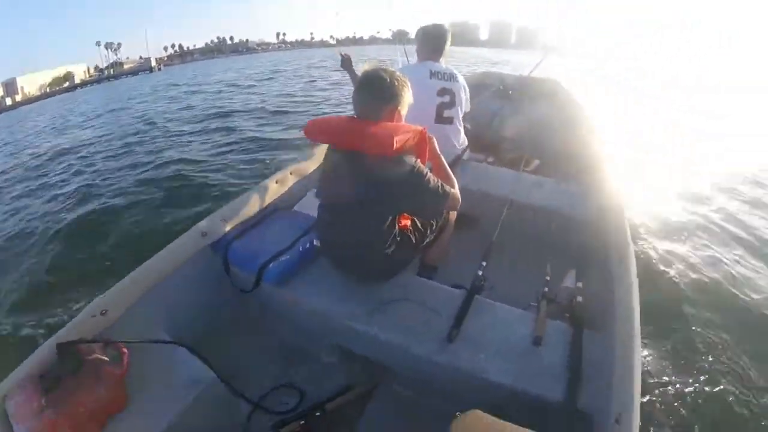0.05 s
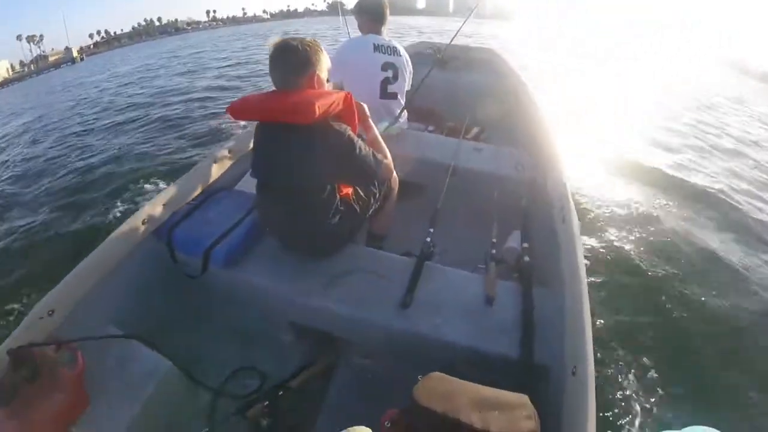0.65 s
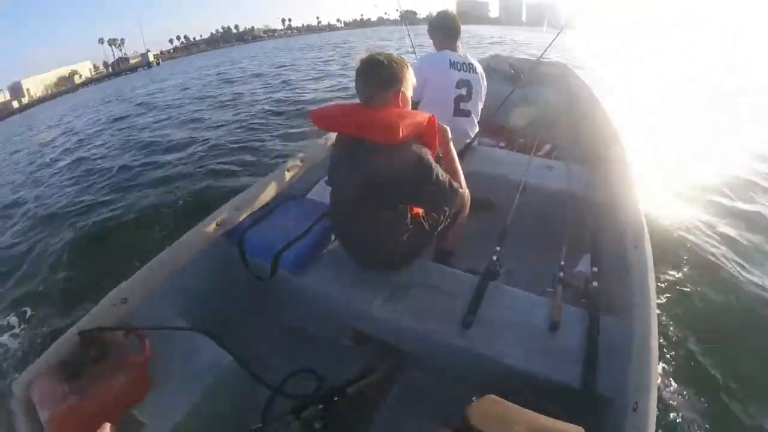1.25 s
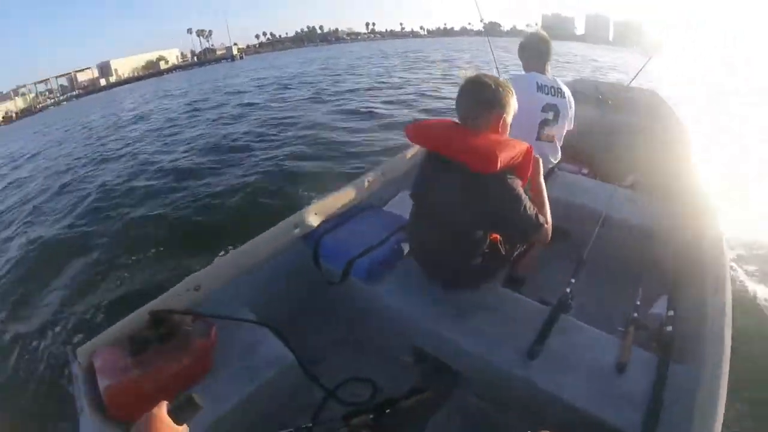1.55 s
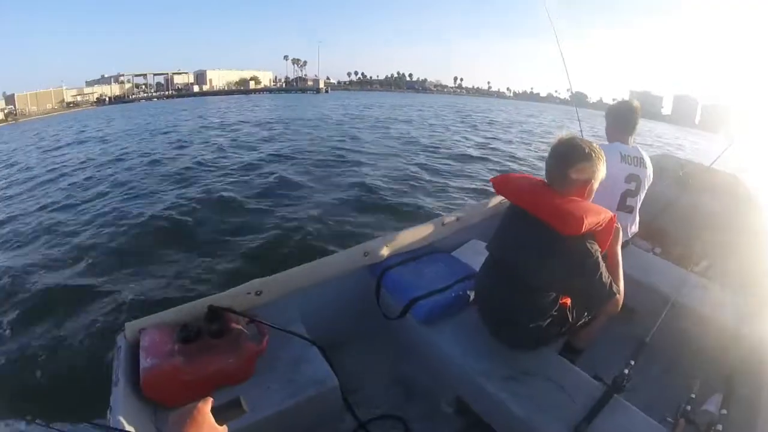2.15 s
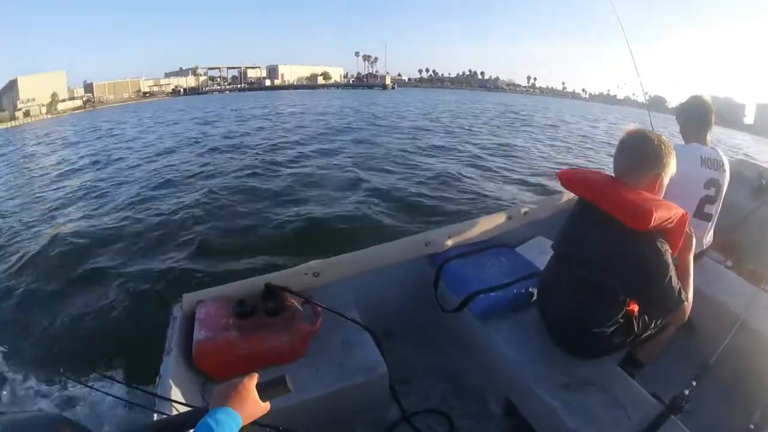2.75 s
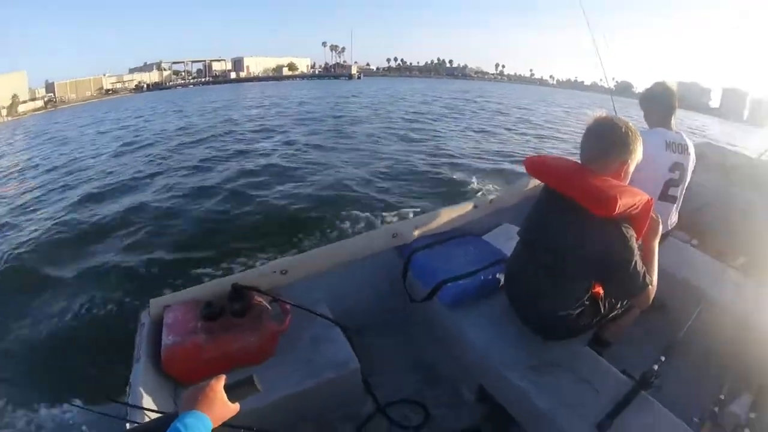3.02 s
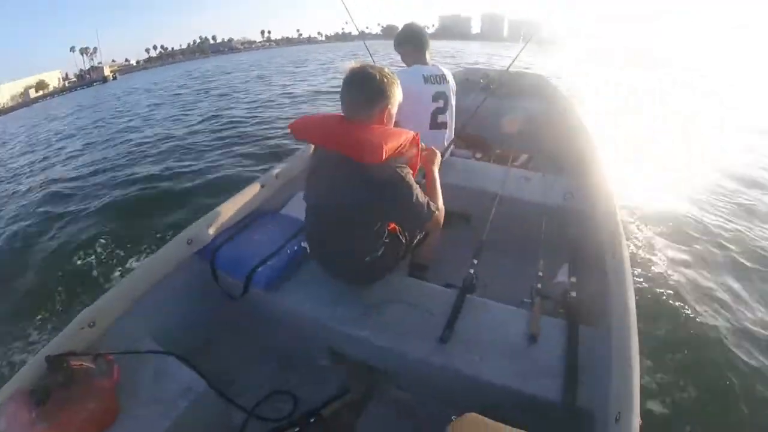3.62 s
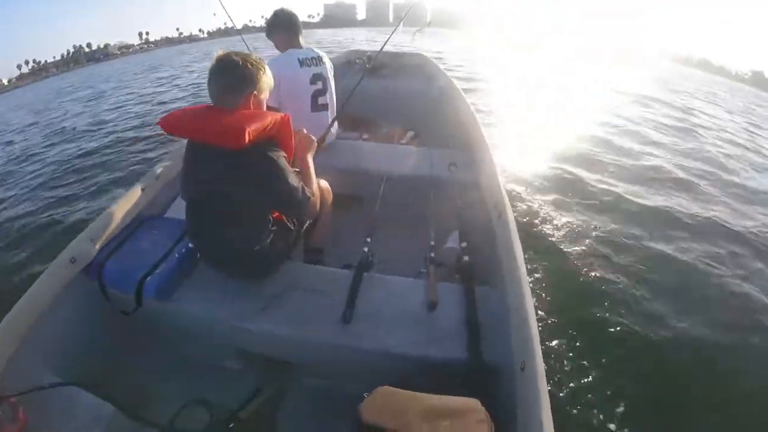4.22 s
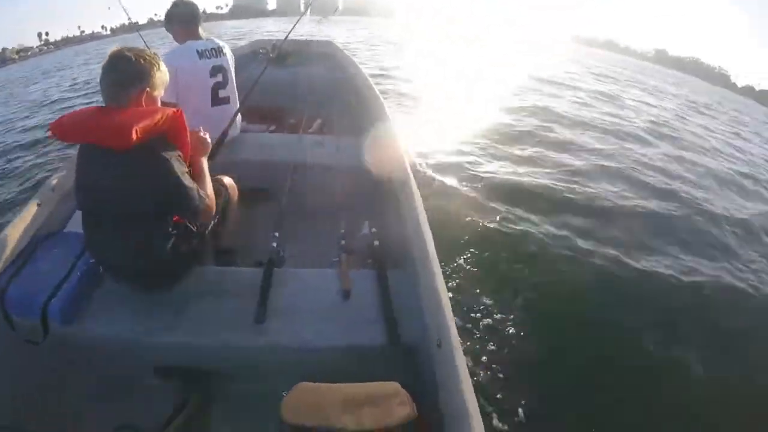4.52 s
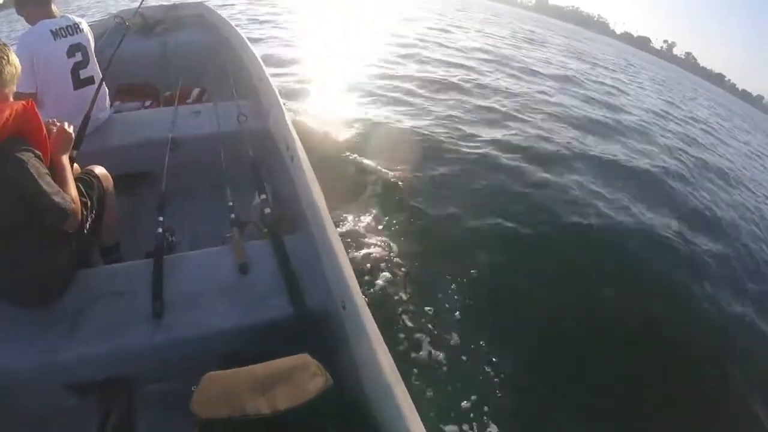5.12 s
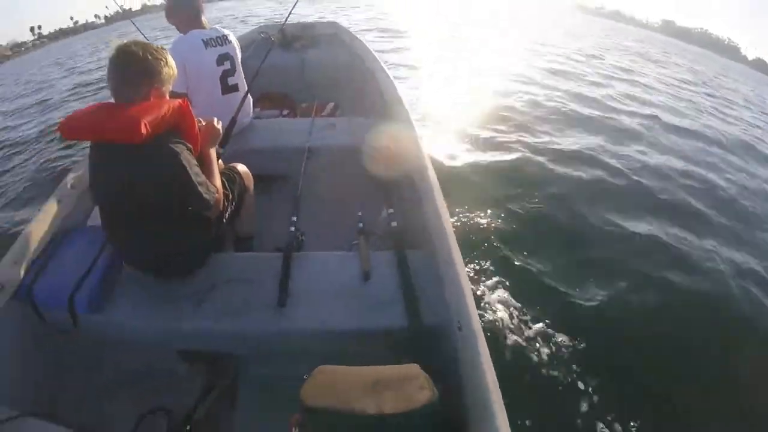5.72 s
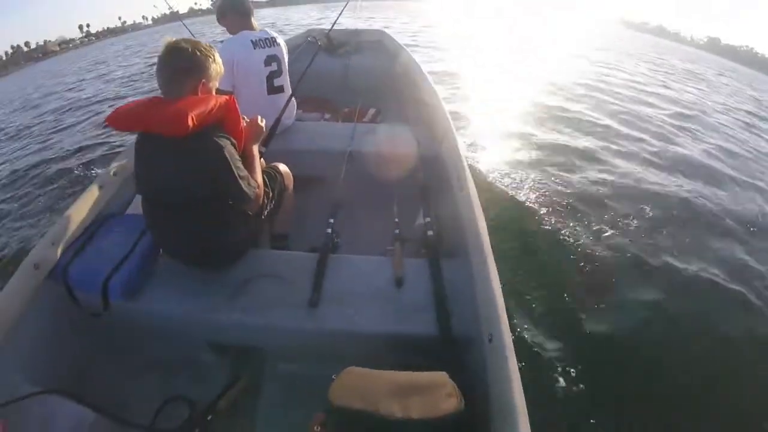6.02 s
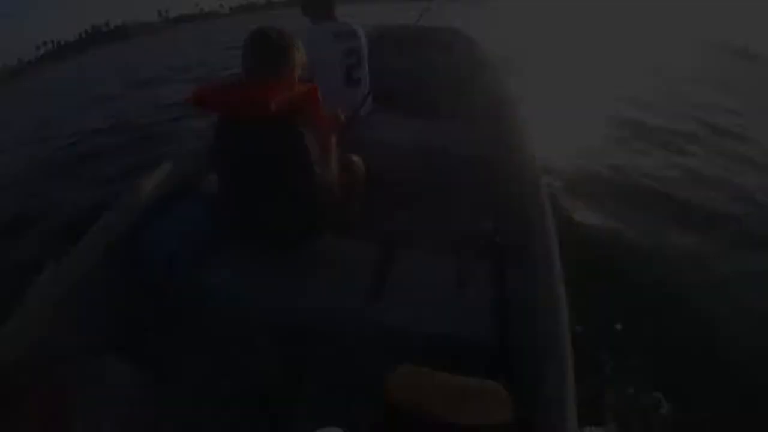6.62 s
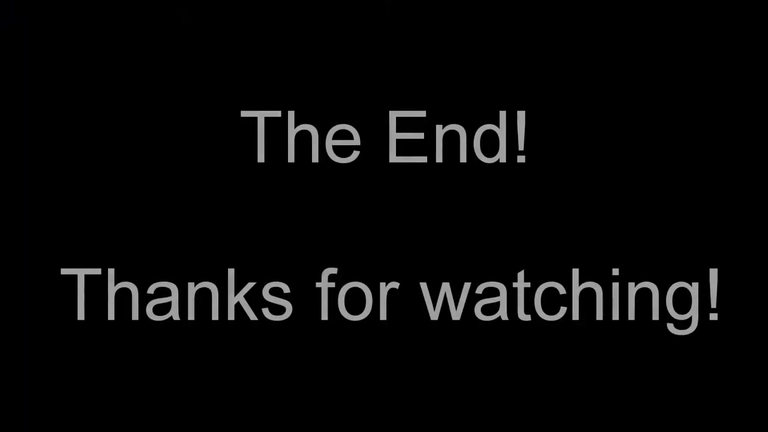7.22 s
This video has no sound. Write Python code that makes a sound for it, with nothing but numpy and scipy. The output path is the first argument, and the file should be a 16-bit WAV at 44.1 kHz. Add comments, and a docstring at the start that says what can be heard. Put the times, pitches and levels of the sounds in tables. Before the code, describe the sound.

Heard close up, a skiff's outboard engine runs at an even speed while water churns and slaps and gusts buffet the microphone.

```python
"""A small outboard motor pushes a skiff over choppy water, heard from the seat at the tiller.
Each turn of the motor gives one exhaust pulse, which drones through the hull, while gears whine
and parts clatter under the cover. The wake fizzes, wavelets slap and wind bumps the microphone.
The motor grows a little louder in the first second and runs on steadily until the sound cuts off."""
import sys
import numpy as np
from scipy import signal
from scipy.fft import rfft, irfft
from scipy.io import wavfile

SR = 44100
rng = np.random.default_rng(int(sys.argv[2]) if len(sys.argv) > 2 else 0)


def to_wav(s):
    """Save 16-bit WAV."""
    ch = np.atleast_2d(s).T  # columns
    pcm = np.round(np.clip(ch, -1, 1) * 32767)  # PCM
    wavfile.write(sys.argv[1], SR, pcm.astype(np.int16))


N = 324576
TIME = np.arange(N) / SR


def undb(db):
    """Turn decibels into a number to multiply by."""
    return np.exp(np.asarray(db) * (np.log(10) / 20))


def unit(x):
    """Scale a sound to an average strength (rms) of 1."""
    return x / np.sqrt(np.mean(x ** 2))


def curves(table):
    """Join each column's points with straight lines in time."""
    times, *columns = np.transpose(table)
    return [np.interp(TIME, times, column) for column in columns]


def ramp(start_s, length_s):
    """Move smoothly from 0 to 1."""
    return .5 - .5 * np.cos(np.pi * np.clip((TIME - start_s) / length_s, 0, 1))


def swells(table):
    """A level that rises and falls around each row's moment."""
    return np.sqrt(sum(undb(db) ** 2 * np.exp(-2 * ((TIME - peak_s) / fade_s) ** 2)
                       for peak_s, db, fade_s in table))


def wander(rate_hz):
    """Drift at random, to a new value rate_hz times a second."""
    points = rng.standard_normal(int(N / SR * rate_hz) + 3)
    return unit(np.interp(TIME * rate_hz + rng.random(), np.arange(len(points)), points))


def colour(x, spectrum):
    """Shape the lows and highs of a sound with (pitch_hz, level_db) points."""
    hz, db = np.transpose(spectrum)
    all_hz = np.maximum(np.fft.rfftfreq(N, 1 / SR), 1)
    gain = undb(np.interp(np.log(all_hz), np.log(hz), db))
    top_fade = np.minimum(hz[-1] / all_hz, 1) ** 4
    return unit(irfft(rfft(x) * gain * top_fade, N))


def ring(x, notes):
    """Make a sound ring at each (pitch_hz, width_hz, level_db); narrow notes ring longer."""
    return unit(sum((-1) ** k * undb(db) * signal.lfilter(*signal.iirpeak(hz, hz / width, SR), x)
                    for k, (hz, width, db) in enumerate(notes)))


def fizz(pops_per_s, spread_db):
    """Tiny pops of very unequal size, like bursting bubbles."""
    sizes = undb(spread_db * np.minimum(rng.exponential(size=N), 5))
    return unit((rng.random(N) < pops_per_s / SR) * sizes * rng.standard_normal(N))


def tones(table, turns, facing_db, waver_db, lead_rad=0.94):
    """Wavering tones at whole multiples of the motor's speed; higher ones lag behind."""
    out = 0
    for multiple, db, facing_factor in table:
        cycles = round(multiple)
        phase = 2 * np.pi * cycles * turns + lead_rad - (cycles / 7) ** 5
        out += np.cos(phase) * undb(db + facing_factor * facing_db + waver_db * wander(6))
    return np.sqrt(2) * out


# How fast the motor spins: time_s, speed_hz
MOTOR_SPEED = [(0.0, 38.63), (0.8, 38.59), (1.5, 38.87), (2.7, 38.96), (3.45, 38.9), (4.0, 38.85),
               (4.9, 39.0), (5.75, 38.72), (6.7, 39.05)]


def motor_turns(start_turn=.194, wobble=.0007):
    """Count the turns of the shaft, which sets the beat for the whole motor."""
    speed_hz, = curves(MOTOR_SPEED)
    return start_turn + np.cumsum(speed_hz * (1 + wobble * wander(20))) / SR


# The head turns towards the motor and away: time_s, hiss_db
HEAD_TURNS = [(0.0, -40), (0.27, -41.5), (1.27, -39.5), (1.62, -36.5), (2.65, -35.5), (2.8, -33.5),
              (3.15, -35.5), (3.3, -38), (4.25, -40), (4.83, -42), (5.91, -41.5), (6.27, -42.5),
              (6.45, -40.5)]


def head_turns():
    """Facing the motor makes it brighter; facing_db is the hiss level above its average."""
    hiss_db, = curves(HEAD_TURNS)
    return hiss_db, hiss_db - np.mean(hiss_db)


# Low, middle and high exhaust tones: cycles_per_turn, level_db, db_per_facing_db
THUMP_TONES = [(1, -19.5, -2), (2, 10, 0)]
BOOM_TONES = [(3, 1.96, 0.1), (4, -0.4, -0.1), (5, -7.5, 0.7)]
DRONE_TONES = [(6, 1, 0.0053), (7, -3.5, -0.32), (8, -18.5, 0), (10, -12.5, -0.63), (11, -13, -0.3),
               (13, -8.5, -0.38), (14, -21, -1.5), (15, -16, -0.59), (16, -17.5, -1.1), (17, -14, -0.57),
               (18, -25, -.5), (19, -21, -0.22), (21, -20, .1), (22, -20.5, 0.56), (23, -18.5, -1)]
# A row each for thump, boom and drone: level_db, low_throttle_db, db_per_facing_db, lead_rad
EXHAUST_MIX = [(-21.6, -4, .05, 0.57), (-19.5, -8, 0.16, 1.25), (-20, -2, 0.48, 1.31)]
# The exhaust swells and sinks as the boat rides the waves: time_s, thump_db, boom_db
WAVE_RIDE = [(0, 4.5, 2.5), (.5, -1, 2), (.62, -3, 0.5), (.77, 3, -7.5), (.85, -1, -1), (1.45, -1.5, -0.5),
             (2.32, 0, 0.5), (2.5, -0.5, -2), (3.1, -1.5, -2.5), (3.35, -2, -2.5), (4.1, -2.5, -0.5),
             (4.4, -1.5, 0.5), (4.95, -0.5, -1), (5.15, 2, -1), (5.35, -2, -0.5), (5.6, 1.5, 1),
             (5.88, -0.5, 1.5), (6.1, 1, -1.5), (6.7, -3.5, 0)]


def exhaust(turns, low_throttle, facing_db, shake_db=0.83, stagger_turns=0.0018):
    """One pulse a turn makes a deep thump, a boom and a drone in the hull."""
    firing = turns + stagger_turns * wander(39)  # each a little early or late
    voices = zip((THUMP_TONES, BOOM_TONES, DRONE_TONES), curves(WAVE_RIDE) + [0], EXHAUST_MIX)
    out = 0
    for table, wave_db, (db, low_db, facing_factor, lead_rad) in voices:
        voice = unit(tones(table, firing, facing_db, waver_db=1.01, lead_rad=lead_rad))
        level_db = db + wave_db + low_db * low_throttle + facing_factor * facing_db
        out += voice * undb(level_db + shake_db * wander(39))
    return out


# How strongly the hull hums: time_s, level_db
HULL_LEVEL = [(0.0, -30), (0.86, -26.5), (1.66, -27), (2.09, -24), (2.48, -26), (2.65, -21.5), (3.4, -26),
              (5.09, -30.5), (5.13, -27), (5.24, -32), (6.53, -28.5), (6.7, -30)]


def hull_hum(turns, cycles_per_turn=9, shake_db=1.0):
    """One exhaust tone matches a natural note of the hull and sings out."""
    level_db, = curves(HULL_LEVEL)
    tone = np.sqrt(2) * np.cos(2 * np.pi * cycles_per_turn * turns - 1)
    return tone * undb(level_db + shake_db * wander(39))


# Tones of the moving parts: cycles_per_turn (rounded when played), level_db, db_per_facing_db
WHINE_TONES = [(24, -25.5, 1), (26, -10.5, -0.1), (27, -17, 0.85), (28, -19, 0.8), (29, -11.5, 0.63),
               (30, -18.5, 0.8), (31, -11.5, -0.8), (32, -14.5, -0.5), (34, -23, -1), (35, -12.5, -0.5),
               (36, -14.5, -0.2), (37, -15, .5), (38, -13.5, -.2), (40, -21, 0), (41, -18.5, -1.8),
               (42, -13, -0.8), (44, -20, -0.5), (45, -17.5, -1.5), (46, -15, -1), (47, -18, 0.6),
               (48, -23, -.8), (49, -19.5, 0), (50, -16, -.5), (53, -24, -0.5), (54, -27, -0.5),
               (62.35, -23, -0.6)]


def whine(turns, facing_db):
    """The spinning parts sing a cluster of high tones."""
    return tones(WHINE_TONES, turns, facing_db, waver_db=2.0)


# Where piston and gears knock in each turn: position_turns, level_db
TURN_KNOCKS = [(.06, -4), (.13, -3), (.26, -4), (.45, -2.5), (.79, -5), (.87, -1), (.98, -5)]


def knocks(turns, scatter_db, drift_db, slop_s, decay_s, size=1100):
    """Each knock is a short rattle that comes back every turn, a little early or late."""
    out = 0
    for position, db in TURN_KNOCKS:
        due_s = np.interp(np.arange(int(turns[-1])) + position, turns, TIME)
        lateness, force = rng.standard_normal((size, 2))[:len(due_s)].T
        starts = np.clip((due_s + slop_s * lateness) * SR, 0, N - 1).astype(int)
        hits = np.zeros(N)
        hits[starts] = undb(db + scatter_db * force)
        rattle = unit(rng.standard_normal(size) * np.exp(-np.arange(size) / SR / decay_s))
        out += signal.oaconvolve(hits, rattle)[:N] * undb(drift_db * wander(3.7))
    return unit(out)


# Natural notes of the motor's cover: pitch_hz, width_hz, level_db
COVER_NOTES = [(630, 180, -2.5), (866, 100, -1.5), (1019, 60, 2), (1130, 60, 0), (1203, 70, 0.5),
               (1450, 79, -2), (1658, 120, -2), (1824, 100, -5.5), (1929, 80, -2.5)]


def clatter(loose_knocks):
    """Loose parts make the cover ring, and it muffles their highs."""
    muffling = [(300, -21.5), (600, -2), (1000, 6.5), (1950, 6.5), (2200, -8.5)]
    return colour(ring(loose_knocks, COVER_NOTES), muffling)


# The wash behind the boat rises and slackens with the waves: time_s, level_db
WASH_LEVEL = [(0, 0.5), (.6, 0), (.75, 1), (1.2, -1), (1.4, 2), (1.9, 1), (2.2, 1.5), (2.9, 0), (3.3, 0),
              (3.85, 0.5), (4.0, 0), (4.2, -2.5), (4.68, -2), (4.8, 1), (5.8, 0), (6.05, -0.5), (6.2, -2.5),
              (6.7, 1)]
# Tone of the churning water: pitch_hz, level_db
CHURN_COLOUR = [(15, -18), (40, -6), (110, -6.5), (190, -6.5), (280, -3), (430, -10.5), (650, -6),
                (850, -11.5), (1300, -13), (1800, -22.5), (2600, -30)]


def churn(turns):
    """Exhaust gas stirs the water in surges, once a turn."""
    wash_db, = curves(WASH_LEVEL)
    surge = undb(0.34 * np.cos(2 * np.pi * turns) + 0.97 * wander(16))
    return colour(rng.standard_normal(N) * surge, CHURN_COLOUR) * undb(wash_db)


# Tone of the motor's rasp: pitch_hz, level_db
RASP_COLOUR = [(1200, -28.5), (1900, 2), (2300, -3), (2900, -4), (3400, -7.5), (4600, -20)]


def rasp(ticks):
    """Ticking parts and a fine crackle give the motor a rough edge."""
    return colour(undb(-3) * ticks + fizz(9000, 1.5), RASP_COLOUR)


# Tone of the air intake: pitch_hz, level_db
INTAKE_COLOUR = [(2200, -22.5), (3000, -9), (4000, -4), (4600, 0), (5000, -0.5), (5400, -1.5), (5650, 0),
                 (6500, -1.5), (7100, -9), (8500, -13), (10000, -27.5)]


def intake_hiss(turns, ticks):
    """Air hisses into the motor in time with the piston, over faint ticking."""
    breath = undb(0.3 * np.cos(2 * np.pi * (turns - .12)) + 0.95 * wander(25))
    return colour(undb(-10) * ticks + breath * fizz(14000, 1.7), INTAKE_COLOUR)


# Notes of the motor's thin metal parts: pitch_hz, width_hz, level_db
METAL_NOTES = [(2460, 70, -7), (3040, 74, -8.5), (3746, 78, -4.5), (4120, 80, -5.5), (4640, 120, -7),
               (5330, 160, -5.5), (5960, 300, -4.5), (6430, 170, -2.5)]


def metal_parts(ticks, fade_db=2.5):
    """Thin parts ring as the motor shakes them; each comes and goes on its own."""
    shaking = ticks + fizz(9000, 1.7)
    ringing = sum(ring(shaking, [(hz, width, 0)]) * np.sqrt(width) * undb(db + fade_db * wander(3))
                  for hz, width, db in METAL_NOTES)
    return colour(ringing, [(1500, -19), (2400, -0.5), (6600, -2.5)])


def steel_ping(turns, position_turns=.15, pitch_hz=6430, width_hz=170, scatter_db=3):
    """A small steel part pings once a turn, never twice equally hard."""
    count = np.floor(turns - position_turns)
    taps = np.diff(count, prepend=count[0])
    return ring(taps * undb(scatter_db * wander(39)), [(pitch_hz, width_hz, 0)])


# Strength of the spray: time_s, level_db
SPRAY_LEVEL = [(0.0, -51), (0.02, -53), (0.24, -56), (1.38, -52.5), (1.57, -48.5), (1.72, -52), (2.43, -49),
               (2.82, -46), (4.33, -52), (4.61, -50), (4.68, -57.5), (5.47, -51.5), (5.49, -56.5),
               (5.91, -55), (6.32, -60.5), (6.7, -51)]
# Tone of the spray: pitch_hz, level_db
SPRAY_TONE = [(5000, -34.5), (6800, -10), (7600, 0.5), (8700, 1.5), (10000, -5), (11400, -12.5),
              (12500, -26.5)]


def spray(ticks, flicker_db=1.5):
    """Fine spray fizzes off the wake, mixed with the brightest edge of the ticking."""
    level_db, = curves(SPRAY_LEVEL)
    mist = colour(fizz(5000, 2.2) + undb(-6) * ticks, SPRAY_TONE)
    return mist * undb(level_db - 1.5 + flicker_db * wander(18))


# Tone of the wind's deep rumble and higher flapping: pitch_hz, level_db
RUMBLE_COLOUR = [(10, -16), (25, -5), (45, -2), (95, -6.5), (160, -14), (300, -26), (800, -48)]
FLAP_COLOUR = [(40, -17), (90, 1), (130, 1), (200, -5.5), (300, -9), (450, -26), (900, -42.5)]
# The breeze between puffs: time_s, level_db
BREEZE_LEVEL = [(0, -34), (.8, -33.5), (1.0, -30), (2.3, -31.5), (2.55, -27), (3.3, -26.5), (3.75, -31.5),
                (4.1, -26.5), (4.35, -31), (4.7, -31), (5.2, -28.5), (6.15, -30), (6.35, -32), (6.7, -33)]
# The strongest puffs: peak_s, rumble_db, flap_db, fade_s
WIND_PUFFS = [(.005, -16.5, -41, 0.035), (0.918, -25.5, -31, .022), (1.105, -23.5, -32, .018),
              (1.164, -16, -29, 0.022), (1.83, -23, -35, 0.047), (2.04, -23, -23, 0.027),
              (2.255, -27, -32, 0.022), (2.44, -20, -25, .02), (2.514, -22, -22, 0.016),
              (2.565, -20, -23, 0.017), (2.725, -17, -15, 0.023), (2.83, -16.5, -25.5, 0.023),
              (2.95, -17, -22.5, 0.025), (2.996, -17.5, -29.5, .014), (3.14, -21, -25.5, 0.025),
              (3.205, -21, -26, .02), (3.27, -16.5, -26, .034), (3.34, -21, -36, .025),
              (3.59, -14.5, -29, 0.016), (3.635, -19, -30, .014), (4.126, -21, -25.5, 0.046),
              (4.2, -15, -26, 0.017), (4.85, -22, -38, 0.044), (5.022, -15, -25, .022),
              (5.232, -22.5, -24.5, 0.04), (5.338, -24, -28, .018), (5.745, -13.5, -15.5, 0.036),
              (5.875, -17, -30, 0.018), (5.998, -20.5, -23.5, 0.027), (6.08, -11.5, -19, 0.02),
              (6.125, -19, -18.5, 0.011), (6.17, -11, -23.5, 0.014)]


def wind(gust_db=2.2, ragged_db=2.5):
    """Air swirls at the microphone: a light flutter, and short puffs that rumble and flap."""
    def swirl(spectrum):
        noise = np.tanh(colour(rng.standard_normal(N), spectrum))
        return unit(noise * undb(ragged_db * np.tanh(wander(90))))

    rumble, flapping = swirl(RUMBLE_COLOUR), swirl(FLAP_COLOUR)
    breeze_db, = curves(BREEZE_LEVEL)
    flutter = undb(breeze_db + gust_db * wander(12))
    peak_s, rumble_db, flap_db, fade_s = np.transpose(WIND_PUFFS)
    rumble *= np.hypot(flutter, swells(zip(peak_s, rumble_db, fade_s)))
    return rumble + flapping * swells(zip(peak_s, flap_db, fade_s))


# Small waves slap the hull: peak_s, level_db, fade_s
WAVE_SLAPS = [(.76, -29, 0.055), (1.05, -37, 0.024), (1.145, -30, .02), (1.37, -31, 0.045),
              (1.995, -28, 0.018), (2.07, -31, .025), (2.2, -32, 0.018), (2.48, -34, 0.032),
              (2.625, -31, .018), (3.14, -32, 0.039), (3.86, -32, .018), (3.975, -23, .02),
              (4.33, -33, .018), (4.76, -33, 0.027), (4.92, -34, 0.018), (5.51, -29, 0.025),
              (5.72, -28.5, 0.03), (6.65, -34, 0.029)]


def wavelets():
    """Each small wave breaks on the side into a cloud of bubbles."""
    watery = [(200, -25), (500, -2.5), (900, 1), (1500, -4.5), (3000, -24), (8000, -33.5)]
    return swells(WAVE_SLAPS) * colour(fizz(2500, 2.4), watery)


# A faint squeak comes and goes: peak_s, level_db, fade_s
SQUEAK_SWELLS = [(.95, -50.5, .3), (1.55, -45.5, .22), (3.12, -41.5, .12), (3.48, -44.5, .09),
                 (3.8, -41, .12), (4.05, -47, .1), (4.28, -46, .05), (4.41, -48, .03), (4.57, -45, .04)]


def squeak(turns, pitch_hz=5350, width_hz=90, throb_db=3.5):
    """A rubbing part sings in pulses, once a turn."""
    note = ring(rng.standard_normal(N), [(pitch_hz, width_hz, 0)])
    throb = undb(throb_db * np.cos(2 * np.pi * turns))
    return swells(SQUEAK_SWELLS) * unit(note * throb)


# Drops land near the microphone: start_s, level_db
SPRAY_DROPS = [(1.5705, -29.5), (2.7665, -31), (2.8828, -35), (2.932, -37)]


def drops(decay_s=0.0013):
    """Each drop of spray lands with a tiny, bright tick."""
    level = sum(undb(db) * (TIME >= start_s) * np.exp(-np.abs(TIME - start_s) / decay_s)
                for start_s, db in SPRAY_DROPS)
    return level * colour(rng.standard_normal(N), [(4000, -24), (7500, -7), (9000, 6.5), (11500, -16)])


def body_shadow(x, turned_away, above_hz=1690, change_db=-8.5):
    """With the head turned far aside, the body blocks some of the highs."""
    highs = signal.sosfiltfilt(signal.butter(8, above_hz, "high", fs=SR, output="sos"), x)
    return x + highs * (undb(change_db * turned_away) - 1)


def scene():
    """Mix motor, water and wind; the throttle and the head's turning set the motor's levels."""
    hiss_db, facing_db = head_turns()
    low_throttle = 1 - ramp(start_s=0.19, length_s=0.74)
    turned_away = ramp(start_s=4.06, length_s=0.19)
    parts_db = -27.5 - 2.5 * low_throttle + 0.21 * wander(11)
    turns = motor_turns()
    # loose parts knock unevenly; tight ones tick almost exactly on time
    loose_knocks = knocks(turns, scatter_db=3, drift_db=2, slop_s=.00008, decay_s=.006)
    ticks = knocks(turns, scatter_db=1.9, drift_db=0, slop_s=.00002, decay_s=.0063)
    parts = whine(turns, facing_db) * undb(parts_db - 2) + clatter(loose_knocks) * undb(parts_db - 7)
    mix = body_shadow(parts, turned_away)
    mix += churn(turns) * undb(parts_db - 0.1)
    mix += rasp(ticks) * undb(-37 - 2.5 * low_throttle - 2.5 * turned_away)
    mix += intake_hiss(turns, ticks) * undb(hiss_db - 1.34)
    mix += metal_parts(ticks) * undb(hiss_db - 4.5)
    mix += steel_ping(turns) * undb(hiss_db + 0.4 * facing_db - 16.5)
    mix += exhaust(turns, low_throttle, facing_db) + hull_hum(turns)
    mix += spray(ticks) + squeak(turns) + wavelets() + drops() + wind()
    return mix[None]


def record(dry, ceiling=0.73, end_s=6.745, top_hz=11900):
    """The microphone rounds the loudest peaks; the sound stops suddenly; the very top is cut."""
    rounded = dry / (1 + (dry / ceiling) ** 6) ** (1 / 6)
    stop = np.clip((end_s - TIME) / 0.007, 0, 1)
    return signal.sosfilt(signal.ellip(8, .2, 70, top_hz, fs=SR, output="sos"), rounded * stop)


dry = scene()
out = record(dry)
to_wav(out)
```